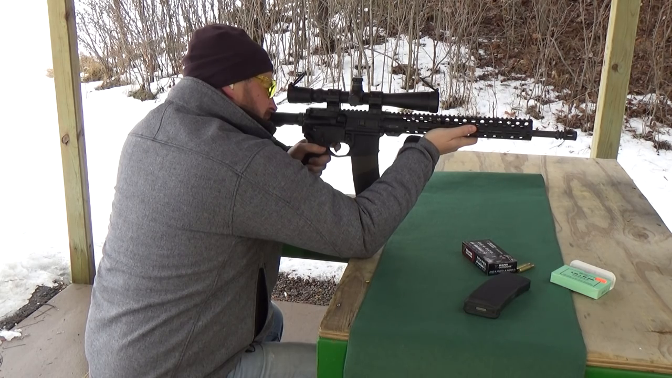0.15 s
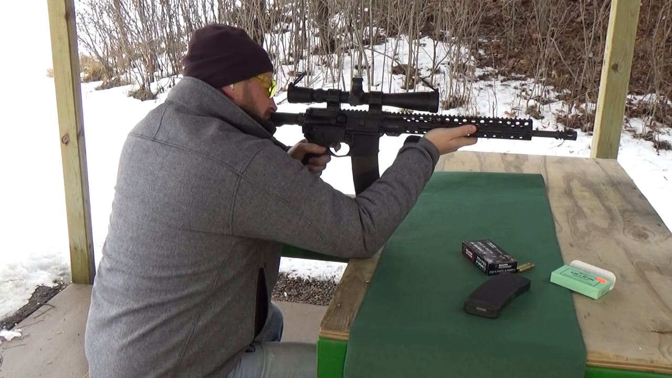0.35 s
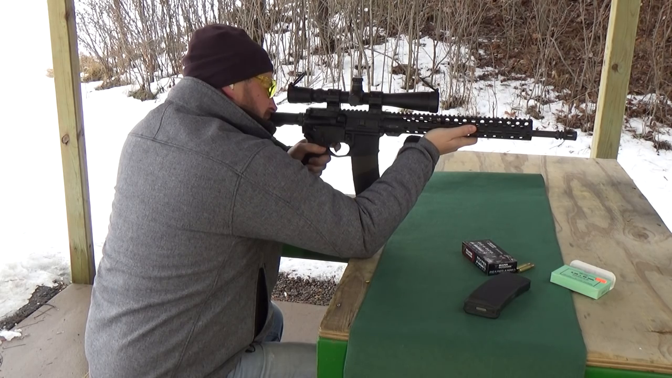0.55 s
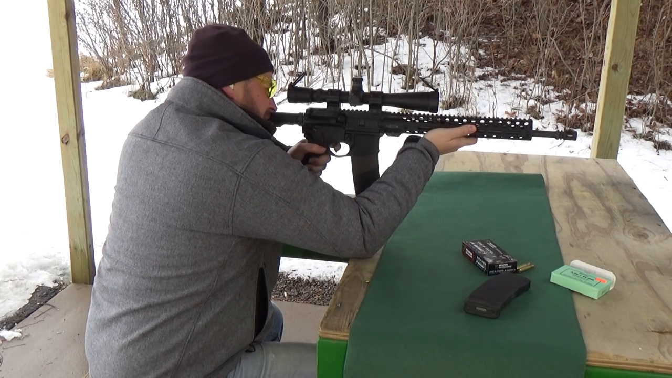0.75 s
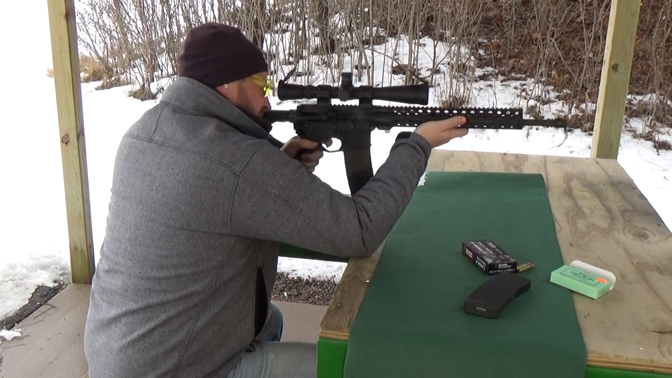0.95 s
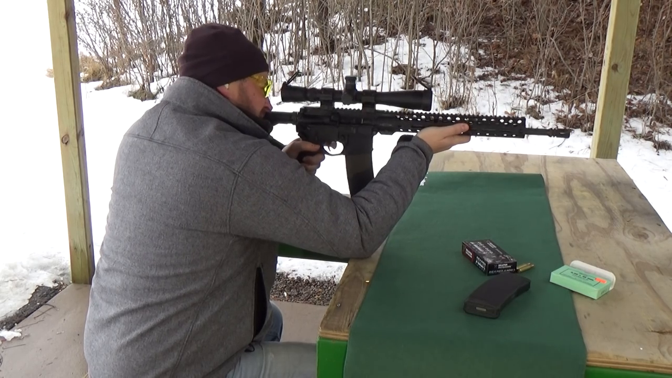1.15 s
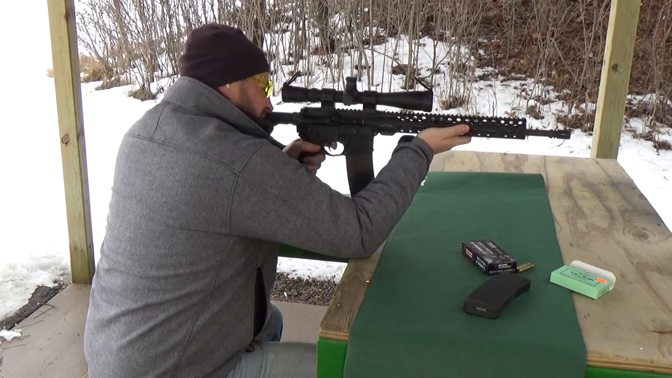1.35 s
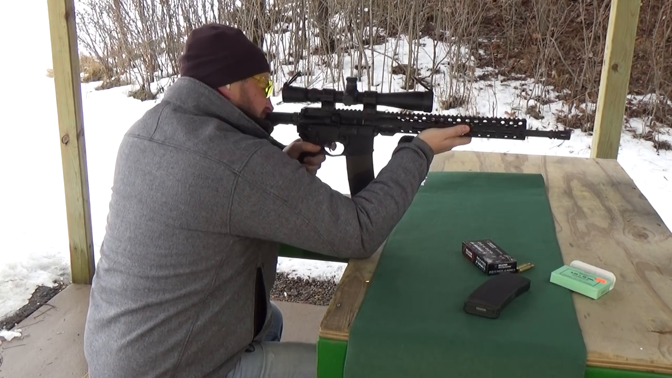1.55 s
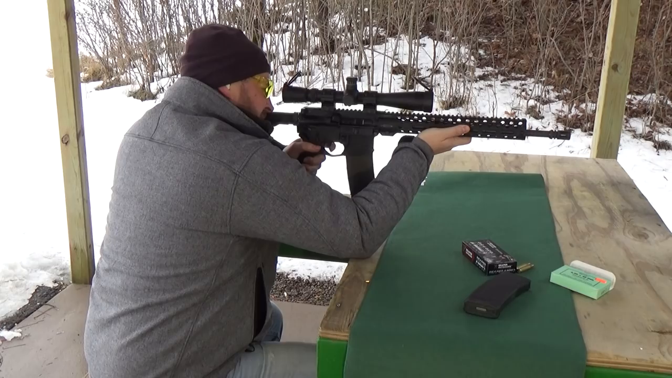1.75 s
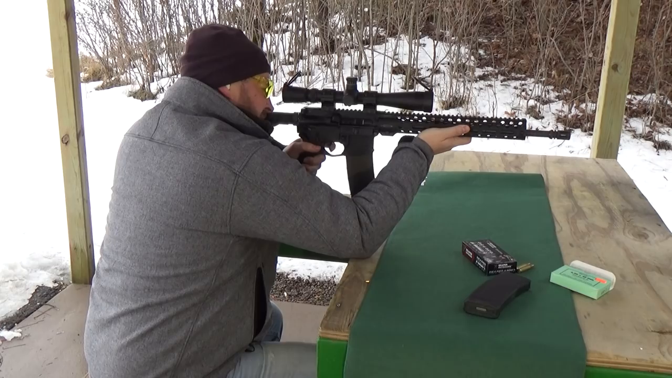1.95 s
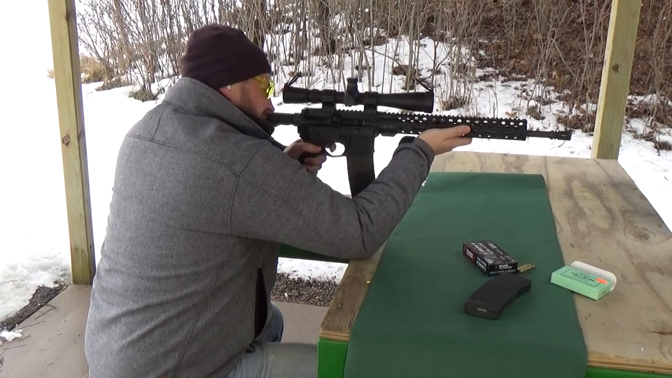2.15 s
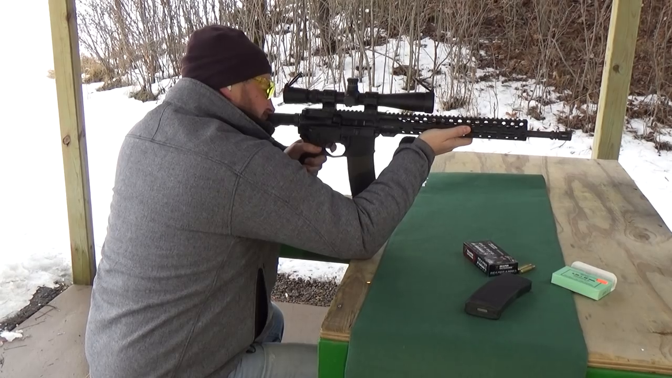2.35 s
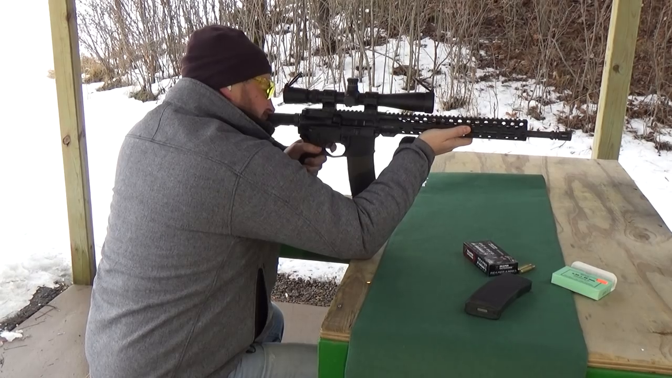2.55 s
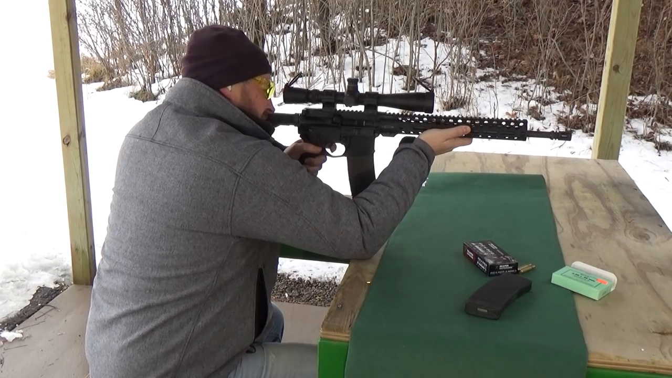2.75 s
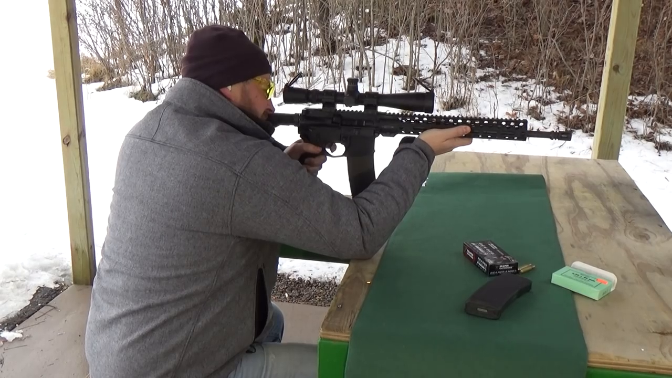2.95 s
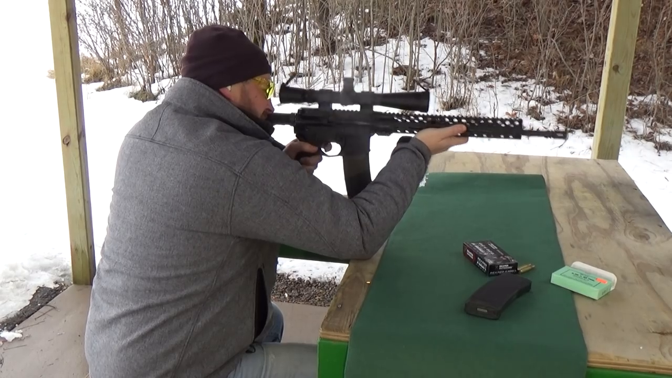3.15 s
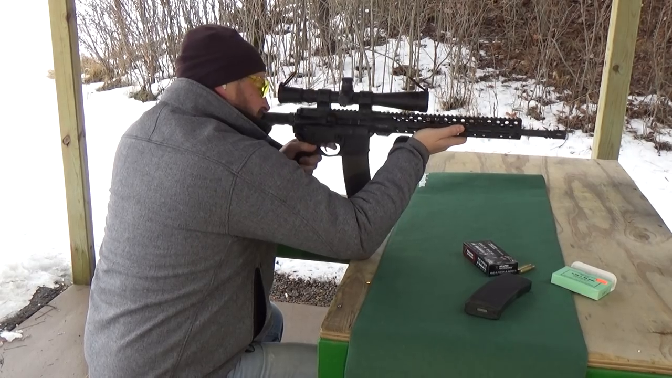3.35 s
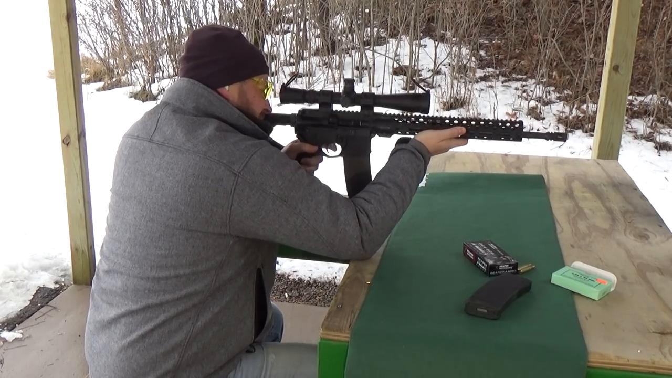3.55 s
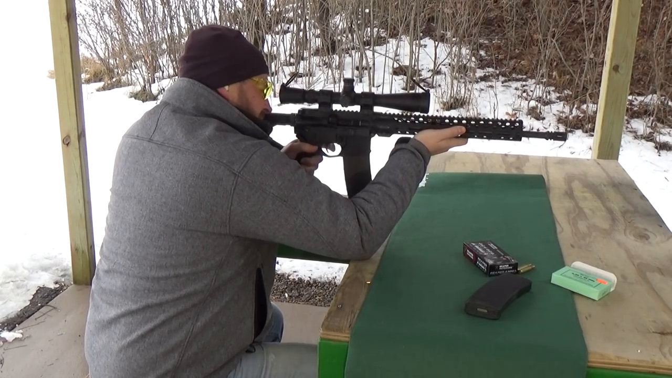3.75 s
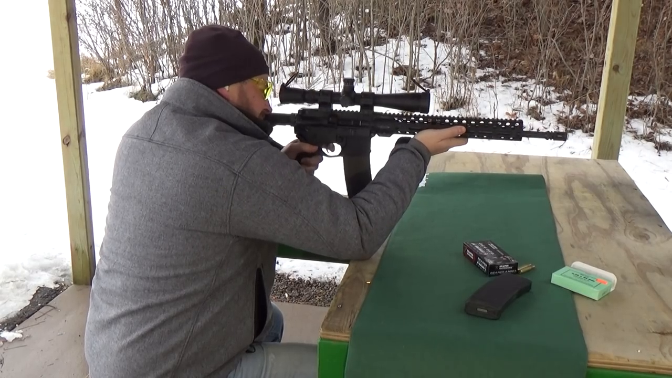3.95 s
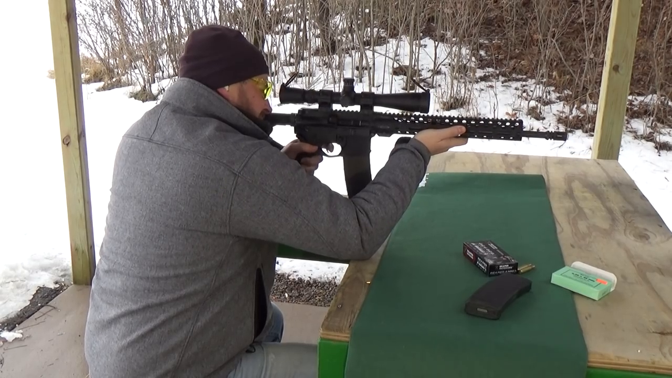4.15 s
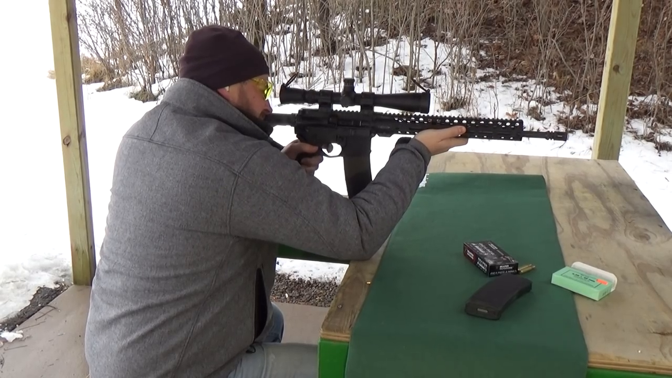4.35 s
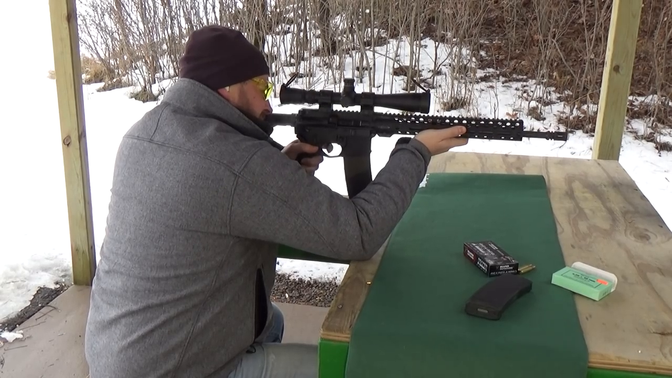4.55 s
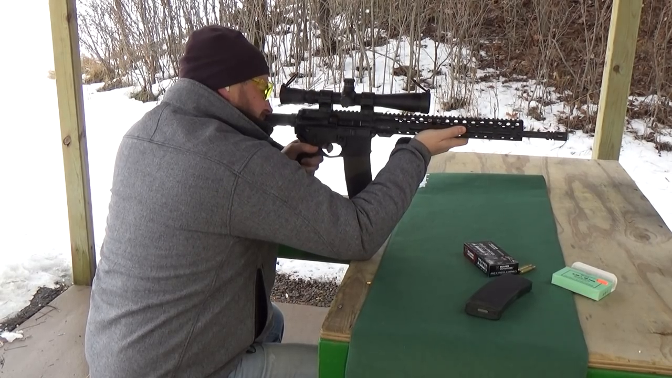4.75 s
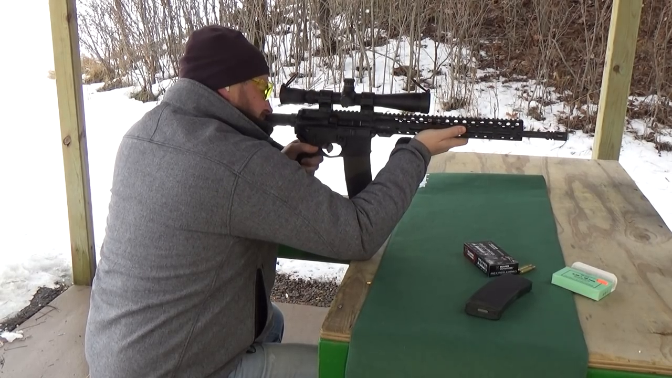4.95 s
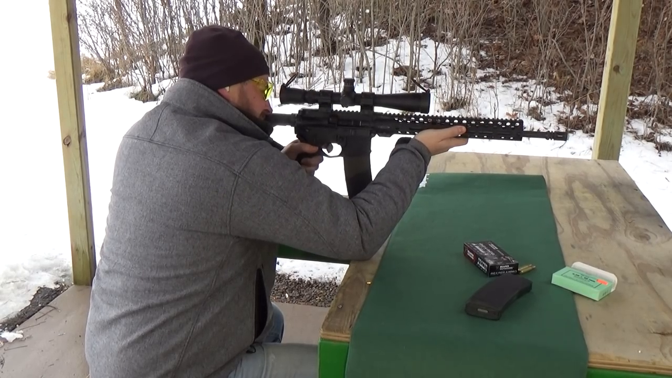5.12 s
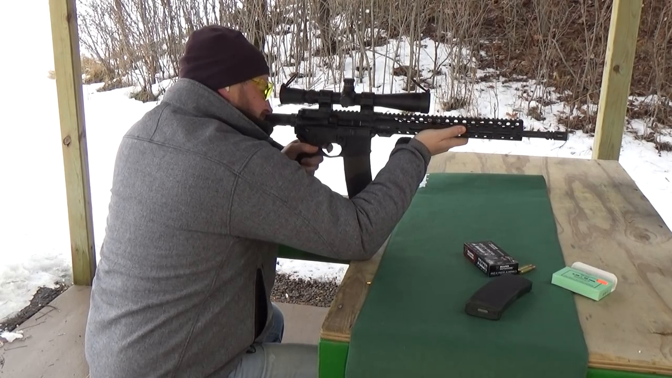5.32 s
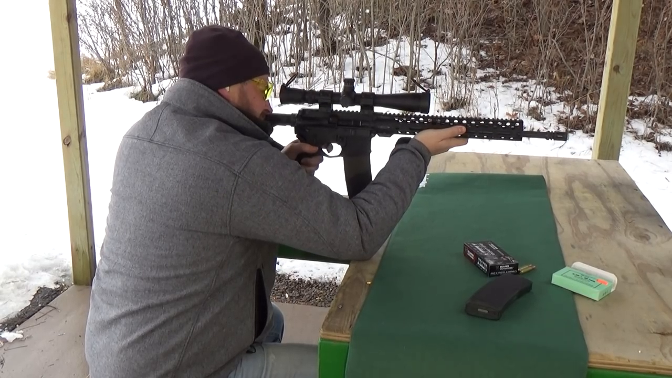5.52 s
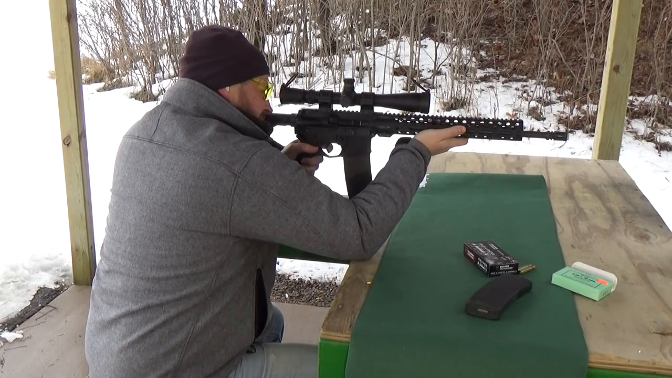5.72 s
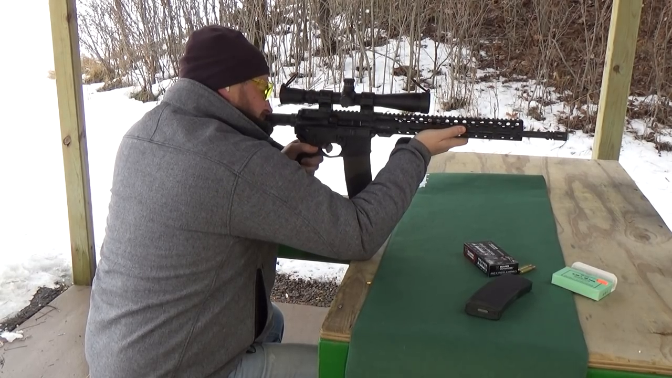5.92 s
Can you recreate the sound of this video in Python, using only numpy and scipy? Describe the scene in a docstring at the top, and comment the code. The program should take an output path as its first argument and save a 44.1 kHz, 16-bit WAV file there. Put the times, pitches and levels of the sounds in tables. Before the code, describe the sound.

Two loud rifle shots crack under a shelter and roll back from the woods, each followed by a clinking brass case.

```python
"""A faint hush lies over a snowy outdoor range. Just after a small snap or two, a rifle fires from a bench.
The shot cracks, fills the shelter and makes it boom, then rolls back from the woods, ever duller
with distance. The spent brass case lands on the concrete, bounces and rings.
About two seconds after the first shot comes a second, with its own snaps and falling case.
The echoes fade, the hush creeps back, and one faint snap comes at the very end."""
import sys
import numpy as np
from scipy import signal
from scipy.fft import rfft, irfft, next_fast_len
from scipy.io import wavfile
from scipy.ndimage import uniform_filter1d, minimum_filter1d, map_coordinates

SR = 44100
rng = np.random.default_rng(int(sys.argv[2]) if len(sys.argv) > 2 else 0)


def log_audio(samples):
    """Write samples as a 16-bit WAV file to the path given in sys.argv[1]."""
    # one column per channel
    frames = np.atleast_2d(samples).T
    # limit to full scale, then quantise
    limited = np.clip(frames, -1, 1)
    pcm = np.round(limited * 32767).astype(np.int16)
    wavfile.write(sys.argv[1], SR, pcm)


N = 263803

# A "colour" says how strong a noise is from low to high. Each row: pitch in Hz, level in dB.
HUSH_COLOUR = [(15, -44), (25, -16), (59, -2.5), (105, -4.5), (140, -2), (200, -1.5), (430, -1), (700, -8),
               (1100, -10.5), (1650, -11.5), (2100, -18), (3100, -18), (5500, -16.5), (15000, -22.5)]  # outdoor air
BLAST_COLOUR = [(20, -37), (55, -23), (110, -4), (300, 2), (480, -2), (730, 4.5), (1000, 2.5), (2000, -1.5),
                (4200, -4), (6000, 3.5), (8000, 0.5), (10000, 2.5), (15500, -14.5)]  # the bright bang
ECHO_COLOUR = [(20, -19.5), (55, -18), (120, -9.5), (220, -5.5), (330, -1), (450, 0), (680, 4), (850, 2.5),
               (1500, -0.5), (3000, -1), (4500, -2), (5800, 0.5), (7300, -3.5), (15500, -7)]  # the roll from the woods
RUMBLE_COLOUR = [(20, -36.5), (60, -11.5), (100, -7), (170, 2.5), (235, 1), (280, -9), (330, -3),
                 (500, -9.5), (1500, -48), (4000, -110)]  # the shelter's rumble
SLOPE_COLOUR = [(200, -61.5), (700, -9.5), (880, -4.5), (1010, 7.5), (1150, -9), (1350, -7.5), (1700, -15),
                (4000, -76.5), (9000, -120)]  # an echo near 1000 Hz
FAR_COLOUR = [(15, -34.5), (30, -15), (45, 1.5), (60, -3), (85, -26), (300, -73), (1000, -120)]  # the farthest, deepest echoes
CLICK_COLOUR = [(300, -40), (2500, -3), (4500, -18), (6500, 1), (8000, 2.5), (10000, 2.5), (12000, -2.5),
                (15500, -18)]  # brass hitting concrete
CLACK_COLOUR = [(300, -35), (2500, -11), (4200, -7.5), (5700, 2.5), (7500, -4.5), (10000, -34),
                (15500, -16)]  # the duller part of that hit
# How wide the noises sound. Each row: pitch in Hz, level in dB of the sides against the middle.
STEREO_WIDTH = [(30, -14.5), (100, -23), (280, -14), (520, -21.5), (1300, -20), (3000, -24), (4400, -39.5),
                (6500, -14.5), (9000, -20), (12000, -31)]
# Which way late echoes lean. Each row: pitch in Hz, how much louder the left is in dB.
ECHO_LEAN = [(40, 0), (120, -3.1), (210, -2.5), (330, -5), (480, -1.5), (760, 3.5), (1200, 1.15),
             (2500, -0.1), (6500, -0.5), (10000, 4.5)]

# Sharp snaps around the shots. Each row: start in seconds, level in dB, strongest pitch in Hz.
SNAPS = [(0.8781, -35.5, 3050), (0.8965, -27.5, 900), (3.158, -44, 5000), (3.170, -39, 5000),
         (3.273, -13, 9990), (3.650, -35.5, 11100), (5.970, -38, 3000)]
# The shots. Each row: start in seconds, level in dB, extra fading of the echoes in dB per second.
SHOTS = [(0.9, -1.5, 1), (3.1802, -2.18, 1)]

# Echoes that swell and die. A fade time ("t60") is how long a sound takes to drop by 60 dB.
# Each row: peak in seconds after the shot, level in dB, steepness of the rise, fade time in seconds.
BLAST_SWELLS = [(.021, -8, .5, 0.14), (.2, -25, .5, 0.74)]  # from the roof, then the nearby brush
ECHO_SWELLS = [(.036, -7, 0.91, 0.6), (.37, -7, 0.6, 2.02), (.95, -17, 2.2, 5.4), (2.05, -29, 8.3, 12)]  # from the range, near woods, far woods and distant ground
WAVE_SWELLS = [(.088, -14.5, 3, 0.3), (.28, -20, 5, 1.94)]  # the shelter's low note, fed by the blast, then its echoes
RUMBLE_SWELLS = [(.07, -15, 0.99, .33), (.24, -18.5, 1.3, 1.3)]  # the shelter's rumble, fed the same way
SLOPE_SWELLS = [(.46, -26.5, 2.5, 4)]  # perhaps from the wooded slope

# Cases hitting the floor. Each row: start in seconds, hit level in dB, ring level in dB, sharpness in dB.
LANDINGS = [(1.6472, -23.5, -15, 4.5), (2.030, -41.5, -49, -7), (2.209, -54.5, -54, 1),
            (2.400, -66.5, -65, 2), (2.850, -62.5, -72, 5.5), (3.8673, -26.5, -32, 3),
            (3.935, -41, -52.5, 4.5), (3.9748, -41, -71, -1), (4.048, -52, -68, 2.5),
            (4.1168, -42.5, -51.5, 3), (4.212, -48, -58.5, 2), (4.245, -40, -48, 3), (4.400, -31, -31, 2),
            (4.499, -40, -36.5, -4.5), (4.575, -41.5, -48, -1), (4.679, -63.5, -50, -3)]
# Spells of light skittering. Each row: start and end in seconds, hit level in dB, ring level in dB.
SKITTERS = [(2.4, 2.952, -76, -72), (3.882, 4.741, -57.5, -60)]
# A case's low and middle notes. Each row: pitch in Hz, fade time in seconds, amount of blur.
BRASS_NOTES = [(10990, .24, 9), (13000, .3, 13)]
# The high note of the first case and of the second, in Hz.
HIGH_NOTES_HZ = [15520, 15720]

ROOF_DELAY_S = .006  # roof and bench answer this much later
TOP_HZ, OVERTONE_HZ = 15900, 19500  # the highest pitch let through, and a brass note above it


def amp(db):
    """Turn decibels into a number to multiply by."""
    return 10 ** (np.asarray(db) / 20)


def unit(x):
    """Scale a signal so its average strength (rms) is 1."""
    return x / np.sqrt(np.mean(x ** 2) + 1e-20)


def along(points, hz):
    """Read between the rows of a pitch table, giving each octave equal room."""
    pitches, values = np.transpose(points)
    return np.interp(np.log(hz + 1), np.log(pitches + 1), values)


def wobble(rate):
    """A smooth curve through `rate` random points a second."""
    return map_coordinates(rng.standard_normal(int(N * rate / SR) + 4), [np.arange(N) * rate / SR])


def filtered(x, response):
    """Turn each pitch up or down by response(hz)."""
    n = x.shape[-1]
    padded = next_fast_len(n + 8192)
    return irfft(rfft(x, padded) * response(np.fft.rfftfreq(padded, 1 / SR)), padded)[..., :n]


def white(size=N):
    """Two unrelated, even hisses."""
    return rng.standard_normal((2, size))


def coloured(noise, colour):
    """Give noise a colour, a narrow stereo spread and a strength of 1."""
    def response(hz):
        return amp(along(colour, hz)) * np.array([np.ones_like(hz), amp(along(STEREO_WIDTH, hz))])
    mid, side = filtered(noise, response)
    return unit(np.array([mid + side, mid - side]))


def fade(t, t60):
    """A level that drops by 60 dB in t60 seconds."""
    return np.exp(-np.log(1000) * t / t60)


def swells(rows):
    """The combined level of echoes that each build up, peak and die away."""
    t, levels = np.arange(N) / SR, []
    for peak_s, db, steepness, t60 in rows:
        rise = np.minimum(t / peak_s, 1) ** abs(steepness)
        levels.append(amp(db) * rise * fade(np.maximum(t - peak_s, 0), t60))
    return np.linalg.norm(levels, axis=0)


def add(track, s, sound):
    """Mix a sound in at s seconds."""
    start = round(s * SR)
    part = sound[..., :N - start]
    track[:, start:start + part.shape[-1]] += part


def hush(db=-55.5, dip_db=11, return_db_per_s=2.5):
    """Faint outdoor air; it sinks at each shot and creeps back."""
    t = np.arange(N) / SR
    dips_db = [(t > s) * np.maximum(dip_db - return_db_per_s * (t - s), 0) for s, *_ in SHOTS]
    return amp(db - np.max(dips_db, axis=0)) * coloured(white(), HUSH_COLOUR)


def snaps():
    """Short cracks with one metallic pitch, probably steel parts such as the hammer and the bolt."""
    out, t = np.zeros((2, N)), np.arange(SR // 8) / SR
    for s, db, hz in SNAPS:
        colour = [(hz / 20, -22), (hz * .68, -12), (hz, 0),
                  (hz * 1.12, -11), (hz * 2, -13), (hz * 10, -34)]
        add(out, s, amp(db) * fade(t, t60=.038) * coloured(white(len(t)), colour))
    return out


def blast(crack_s=.0014, crack_db=-14, gas_db=-25):
    """The crack and the rush of gas behind it, then the answer of roof, bench and brush."""
    t = np.arange(N) / SR
    direct = amp(np.where(t < crack_s, crack_db, gas_db))
    level = np.where(t < ROOF_DELAY_S, direct, swells(BLAST_SWELLS))
    return level * coloured(white(), BLAST_COLOUR)


def through_air(x, loss_db, power):
    """Later echoes have come further: air takes loss_db a second at 1000 Hz, and more higher up."""
    hz, t, bands = signal.stft(x, SR, nperseg=512)
    khz = hz[:, None] / 1000
    return signal.istft(bands * amp(-loss_db * khz ** power * t), SR, nperseg=512)[1][:, :N]


def patchy(x, depth_db):
    """Overlapping echoes favour different pitches from moment to moment."""
    bands = signal.stft(x, nperseg=1024)[2]
    patches = uniform_filter1d(rng.standard_normal(bands.shape[1:]), 3, axis=0)  # smooth over pitch
    patches = uniform_filter1d(patches, 7, axis=1)  # and over time
    gain = unit(amp(depth_db * unit(patches)))
    return signal.istft(bands * gain, nperseg=1024)[1][:, :N]


def woods(terrain, steady_hz=594, spread_s=.3):
    """Countless trees scatter the shot: the lows alike each time, the highs stirred by moving air."""
    def steady_share(hz):
        return 1 / (1 + (hz / steady_hz) ** 2)
    steady = filtered(terrain, steady_share)
    stirred = filtered(white(), lambda hz: np.sqrt(1 - steady_share(hz) ** 2))
    ahead = through_air(coloured(steady + stirred, ECHO_COLOUR), loss_db=3, power=1.386)
    # later echoes come from the sides, where each opening favours its own pitches
    aside = filtered(ahead, lambda hz: amp(np.outer([.5, -.5], along(ECHO_LEAN, hz))))
    spreading = aside + (ahead - aside) * np.exp(-np.arange(N) / SR / spread_s)
    return swells(ECHO_SWELLS) * patchy(spreading, depth_db=1.6)


def shelter_boom(wave_hz=119.4, drift_hz=2.4, throb_db=4, left_db=-.75):
    """Sound trapped under the roof builds one low note (a standing wave) over a broad rumble."""
    phase = 2 * np.pi * np.cumsum(wave_hz + drift_hz * wobble(25)) / SR
    ease_in = np.minimum(np.arange(N) / SR * 2, 1)
    throb = amp(throb_db * wobble(22) * ease_in)  # late echoes feed the note unevenly
    wave = swells(WAVE_SWELLS) * throb * np.sqrt(2) * np.sin(phase)
    rumble = swells(RUMBLE_SWELLS) * coloured(white(), RUMBLE_COLOUR)
    return (wave + rumble) * amp([[left_db / 2], [-left_db / 2]])


def slope_echo():
    """A middle-pitched echo swells out of the roll, perhaps from the wooded slope."""
    return swells(SLOPE_SWELLS) * coloured(white(), SLOPE_COLOUR)


def far_roll(db=-55, t60=27):
    """Only the deepest bass comes back from far away, and it lingers for seconds."""
    t = np.arange(N) / SR
    return amp(db) * np.minimum(t * 2, 1) * fade(t, t60) * coloured(white(), FAR_COLOUR)


def shots():
    """Each shot is a blast, followed by the shelter's boom and the long roll of echoes."""
    out, t = np.zeros((2, N)), np.arange(N) / SR
    terrain, boom = white(), shelter_boom()  # shared by both shots
    # groups of trees and single trunks make the roll uneven
    clumps = amp(.5 * wobble(12) + .5 * wobble(45) + .9 * wobble(300))
    for s, db, fading_db in SHOTS:
        bang = blast()
        echoes = clumps * (woods(terrain) + slope_echo()) + boom + far_roll()
        add(out, s, amp(db) * (bang + amp(-fading_db * t) * echoes))
    return out


def ring(hz, t60, blur, t, spin_hz):
    """One note of a tumbling case: its spin makes it flutter, and the shelter blurs it."""
    spin_phase, note_phase = rng.uniform(0, 2 * np.pi, 2)
    flutter = 1 + .5 * np.sin(2 * np.pi * spin_hz * t + spin_phase)
    drift = blur * np.cumsum(rng.standard_normal(len(t))) / np.sqrt(SR)
    return np.sqrt(2) * fade(t, t60) * flutter * np.sin(2 * np.pi * hz * t + note_phase + drift)


def cases(roof_db=-7, roof_t60=.15, clack_db=-3, clack_t60=.11, mouth_s=4.418, mouth_db=-35):
    """Brass lands on concrete: a click, its echo under the roof, a duller clack and a thin ring."""
    out, t = np.zeros((2, N)), np.arange(SR // 2) / SR
    late = np.maximum(t - ROOF_DELAY_S, 0)
    click_shape = amp(4.5) * fade(t, .008) + amp(roof_db) * (late > 0) * fade(late, roof_t60)
    clack_shape = amp(clack_db) * (late > 0) * fade(late, clack_t60)
    low_note, middle_note = BRASS_NOTES
    for s, hit_db, ring_db, sharp_db in LANDINGS + skitters(count=9, scatter_db=4.5):
        spin_hz = rng.uniform(37, 100)
        high_hz = HIGH_NOTES_HZ[int(s > SHOTS[1][0])]
        # sharp landings favour the click and high note, blunt ones the clack and middle note
        click = amp(hit_db + sharp_db) * click_shape * coloured(white(len(t)), CLICK_COLOUR)
        clack = amp(hit_db - sharp_db) * clack_shape * coloured(white(len(t)), CLACK_COLOUR)
        middle = amp(ring_db - sharp_db) * ring(*middle_note, t, spin_hz)
        high = amp(ring_db + sharp_db) * ring(high_hz, t60=.28, blur=22, t=t, spin_hz=spin_hz)
        # too high to hear, but strong enough to work the limiter
        overtone = amp(ring_db + sharp_db + 8) * ring(OVERTONE_HZ, t60=.35, blur=4, t=t, spin_hz=spin_hz)
        add(out, s, click + clack + middle + high + overtone)
    # one landing, perhaps on the case's open mouth, also wakes the low note
    add(out, mouth_s, amp(mouth_db) * ring(*low_note, t, spin_hz))
    return out


def skitters(count, scatter_db):
    """Between landings a case touches the floor lightly at random; gives rows like LANDINGS."""
    rows = []
    for start, end, hit_db, ring_db in SKITTERS:
        times = start + (end - start) * (np.arange(count) + rng.random(count)) / count
        levels = [hit_db, ring_db, 0] + scatter_db * rng.standard_normal((count, 3))
        rows += list(np.column_stack([times, levels]))
    return rows


def limiter(x, limit_db, window):
    """Quickly turn everything down while the last few milliseconds are too loud."""
    power = uniform_filter1d(np.mean(x ** 2, axis=0), window, origin=window // 3)
    level = np.sqrt(np.abs(power))
    needed_gain = amp(limit_db) / np.maximum(level, amp(limit_db))
    held_gain = minimum_filter1d(needed_gain, window * 2, origin=window - window // 4)
    return x * uniform_filter1d(held_gain, window // 2)


def scene():
    """Everything heard beside the bench."""
    return shots() + snaps() + cases() + hush()


def record(dry):
    """Hold loud moments down, round off the tallest peaks and cut the very highest pitches."""
    held = limiter(dry, limit_db=-8, window=180)  # 180 samples is about 4 ms
    audible = filtered(held, lambda hz: hz < (TOP_HZ + OVERTONE_HZ) / 2)
    rounded = audible / (1 + np.abs(audible / .82) ** 6) ** (1 / 6)
    return filtered(rounded, lambda hz: 1 / np.sqrt(1 + (hz / TOP_HZ) ** 200))


dry = scene()
out = record(dry)
log_audio(out)
```